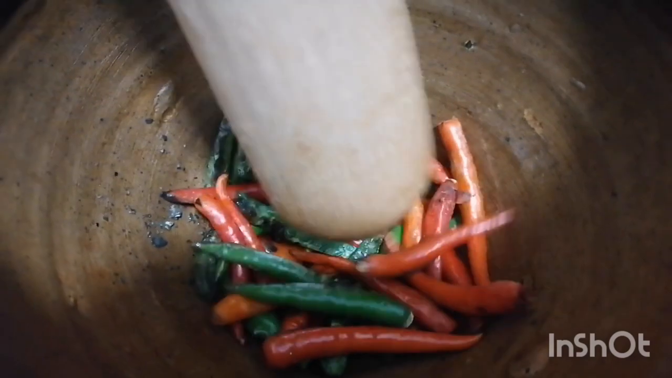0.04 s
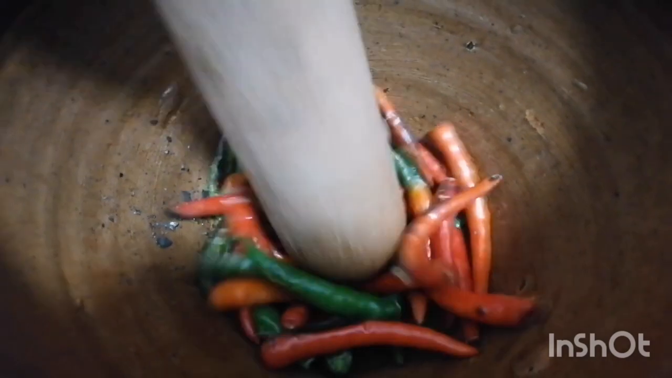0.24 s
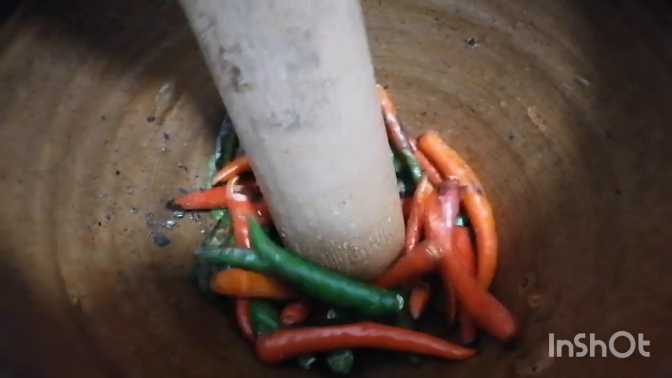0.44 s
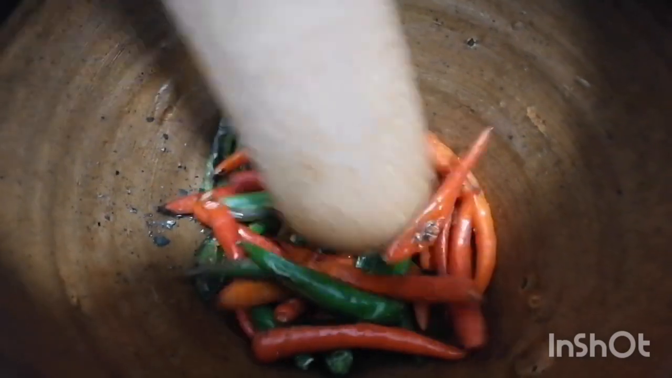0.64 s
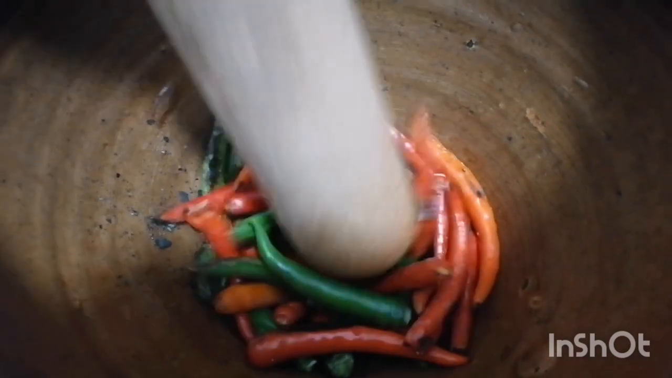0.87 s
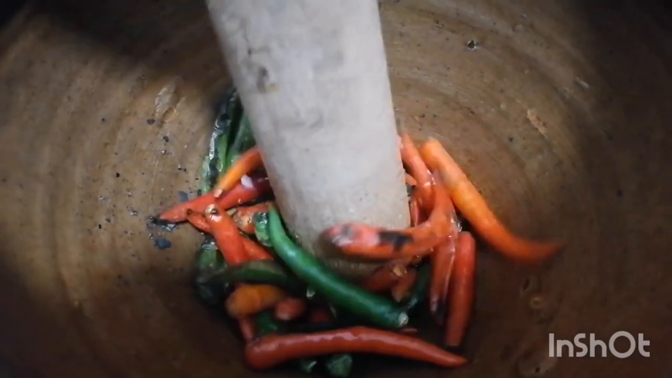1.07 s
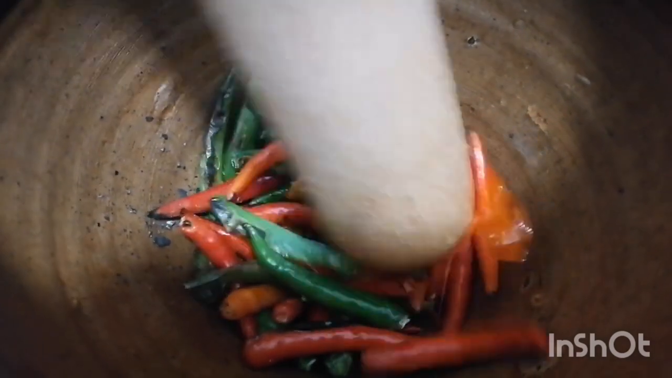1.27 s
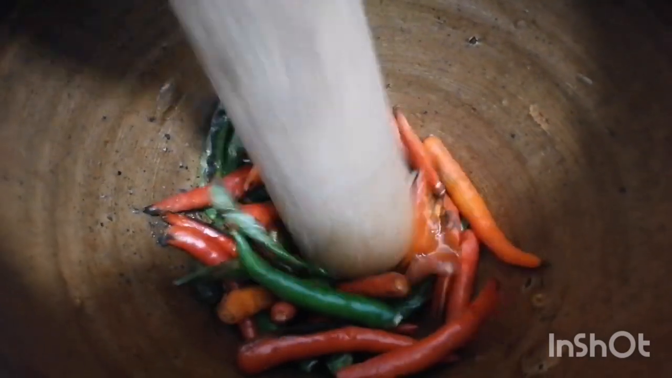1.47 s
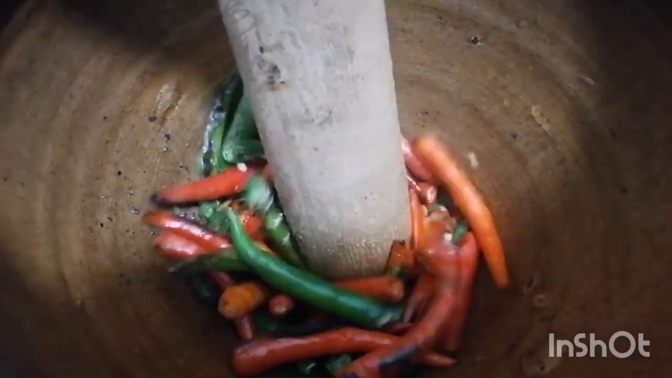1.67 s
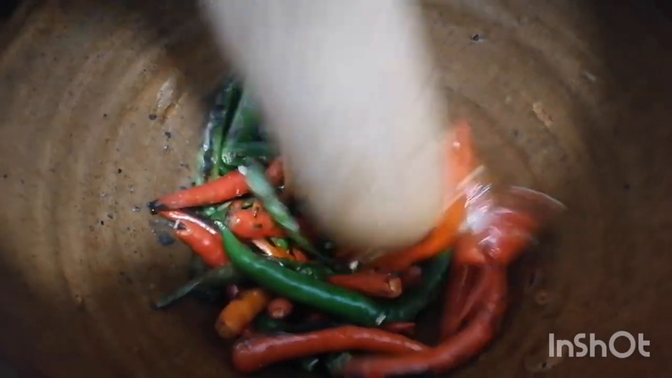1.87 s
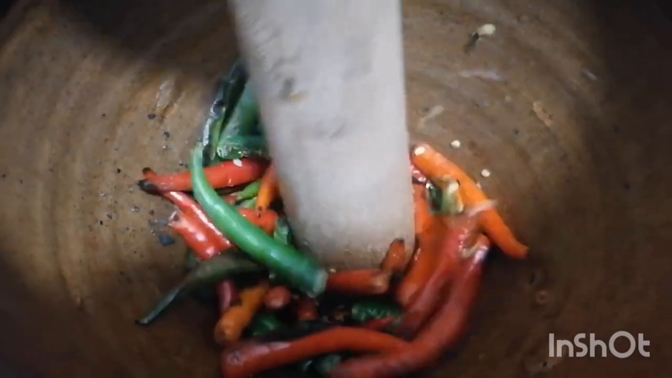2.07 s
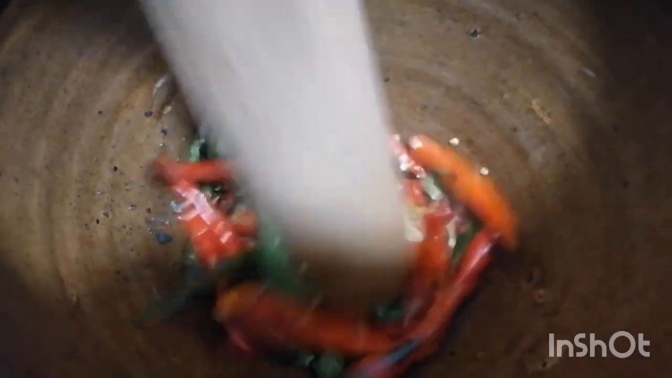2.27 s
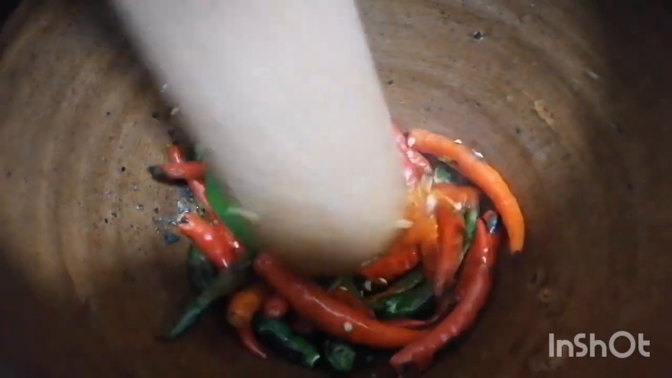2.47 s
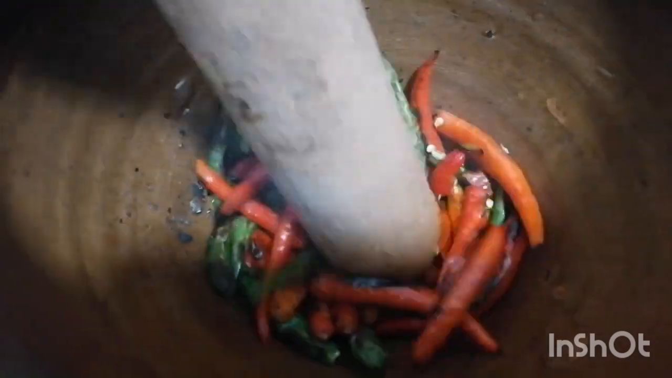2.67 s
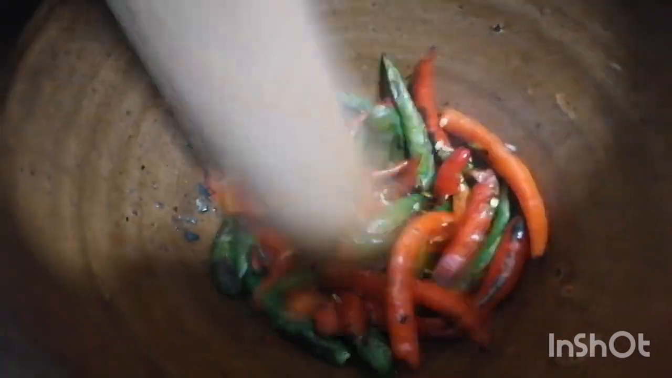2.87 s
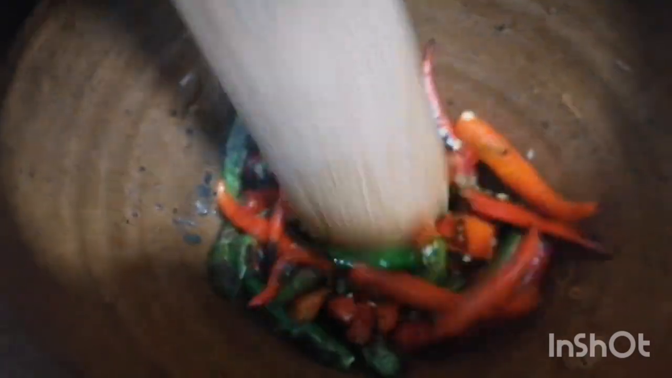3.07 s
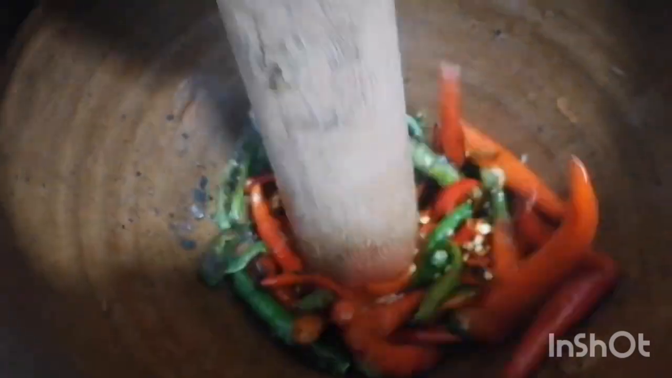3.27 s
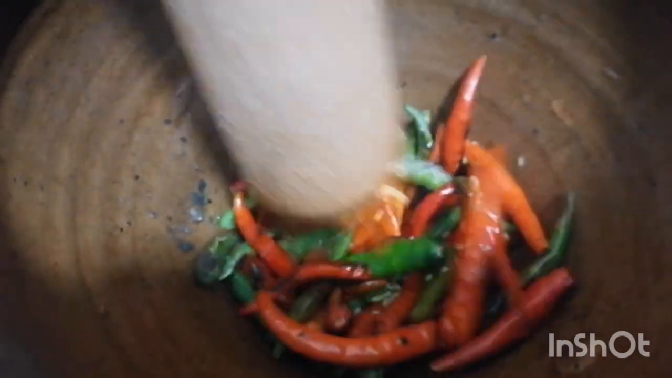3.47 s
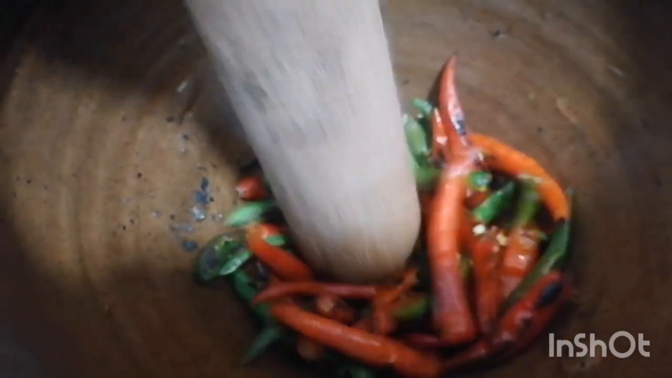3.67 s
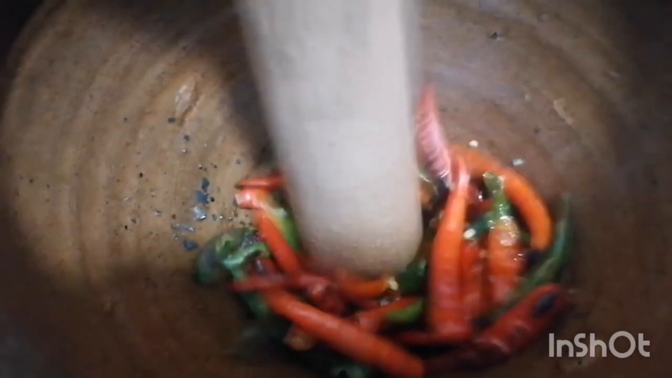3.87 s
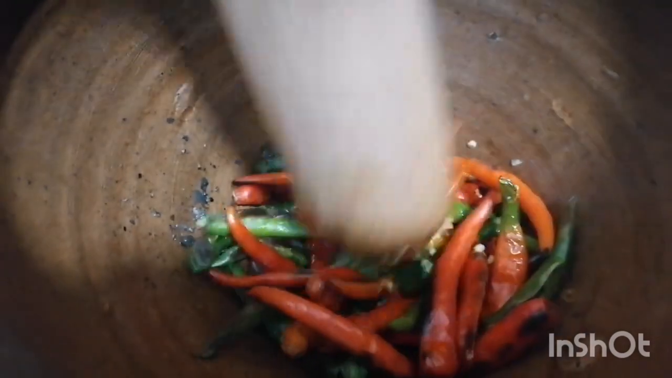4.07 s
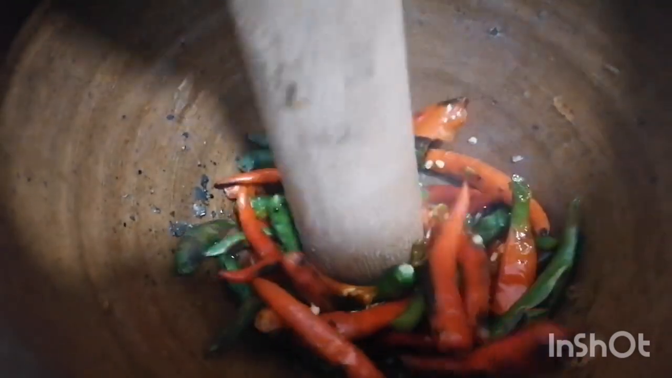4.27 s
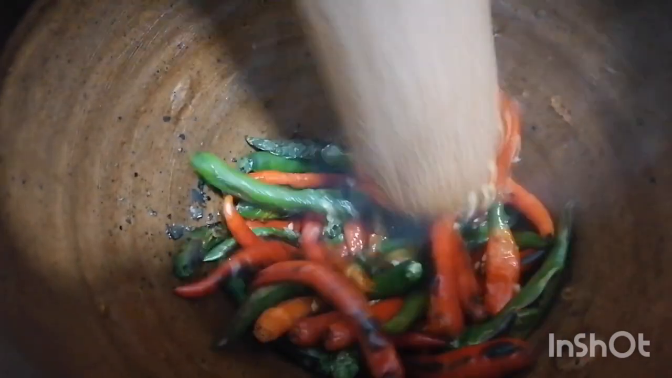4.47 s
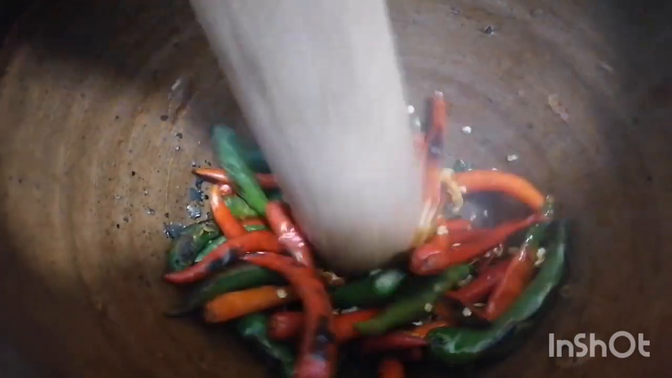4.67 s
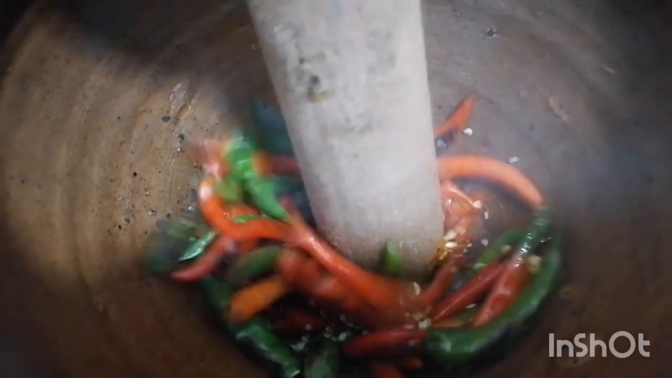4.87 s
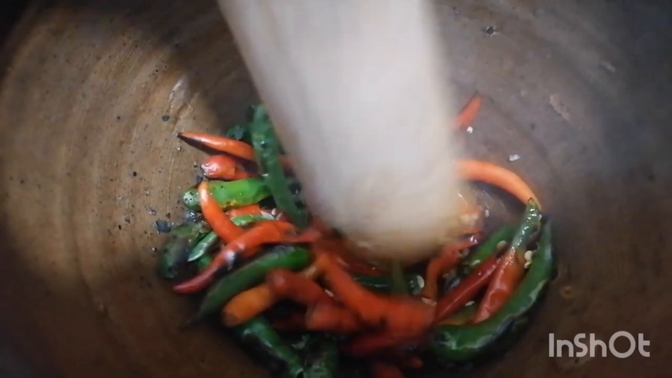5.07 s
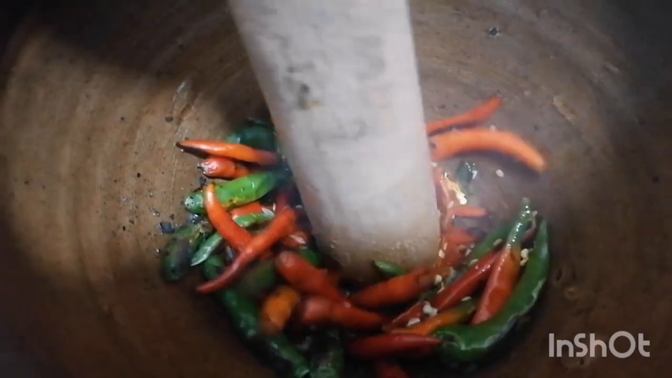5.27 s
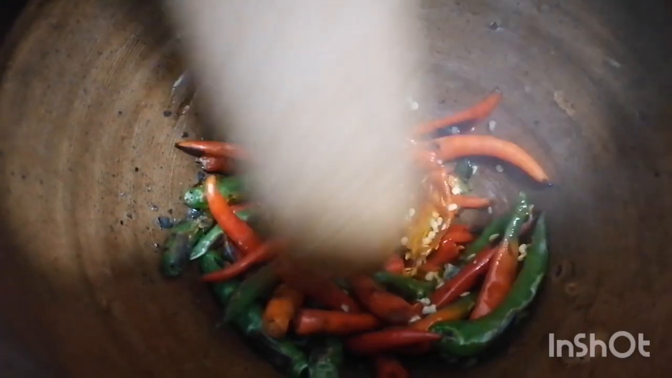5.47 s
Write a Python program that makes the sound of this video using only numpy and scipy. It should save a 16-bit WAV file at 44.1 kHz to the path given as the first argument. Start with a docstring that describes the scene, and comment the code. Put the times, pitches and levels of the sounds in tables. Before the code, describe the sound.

A wooden pestle pounds fresh chillies in a clay mortar about three times a second, each hollow knock wrapped in a wet, crackling crunch.

```python
"""Faint hiss and rumble come first, with the fading ring of an earlier stroke in a small kitchen.
Then a wooden pestle pounds fresh chillies in a clay mortar, about three blows a second.
Pods crackle and burst as swarms of random snaps over noise, echoed between the clay walls.
Each blow is a hollow double knock of decaying sine modes; the support under the mortar hums on.
Seeds tick as they fall back, low booms follow some blows, and filtered noise makes the room's answer."""
import sys
import numpy as np
from scipy import signal
from scipy.fft import rfft, irfft
from scipy.io import wavfile
from scipy.ndimage import uniform_filter1d

SR = 44100
rng = np.random.default_rng(int(sys.argv[2]) if len(sys.argv) > 2 else 0)


def inscribe(sig):
    """Save sig as 16-bit PCM at rate SR to the path in sys.argv[1].

    A 1-D sig is mono; a 2-D sig holds one channel per row.
    Samples are clipped to [-1, 1] before scaling.
    """
    pcm = np.round(np.clip(np.atleast_2d(sig).T, -1, 1) * 32767)
    wavfile.write(sys.argv[1], SR, pcm.astype(np.int16))


N = 243564
TIME = np.arange(N) / SR
GRID_HZ = np.linspace(0, SR / 2, 4097)


def from_db(db):
    """Level law: decibels become an amplitude ratio."""
    return 10 ** (np.asarray(db) / 20)


def rms_one(x):
    """Normalisation: scale to unit root-mean-square amplitude."""
    return x / np.sqrt(np.mean(x ** 2) + 1e-20)


def at_hz(points, hz, axis=1):
    """Interpolation on a logarithmic frequency axis: read one column of a spectrum."""
    points = np.array(points)
    return np.interp(np.log(np.maximum(hz, 1)), np.log(points[:, 0]), points[:, axis])


def dying(t, t60):
    """Exponential decay: the level falls by 60 dB in t60 seconds."""
    return np.exp(-np.log(1000) * t / t60)


def sine(hz, t, turns=0):
    """Simple harmonic motion, starting at a phase given in turns."""
    return np.sin(2 * np.pi * (hz * t + turns))


def filtered(x, order, hz, kind="low"):
    """Butterworth filtering: a passband without ripple."""
    return signal.sosfilt(signal.butter(order, hz, kind, fs=SR, output="sos"), x)


def add(track, s, sound):
    """Superposition: mix a sound into a track at time s."""
    start = max(round(s * SR), 0)
    track[..., start:start + sound.shape[-1]] += sound[..., :max(N - start, 0)]


def through(x, response):
    """Convolution: pass a sound through a left and a right impulse response."""
    return signal.fftconvolve(np.atleast_2d(x), response, axes=-1)[:, :N]


def colour(left_db, right_db):
    """Minimum phase: fold the cepstrum of each magnitude spectrum into a causal stereo filter."""
    cepstrum = irfft(np.log(from_db([left_db, right_db])))
    half = cepstrum.shape[1] // 2
    cepstrum[:, 1:half] *= 2
    cepstrum[:, half + 1:] = 0
    return irfft(np.exp(rfft(cepstrum)))


# Course of the deep rumble: (time [s], relative level [dB])
RUMBLE_COURSE = [(0, -71), (0.65, -59), (1.3, -77), (2.2, -72), (3.5, -79), (4.4, -75), (4.85, -63),
                 (5.52, -70)]


def rumble(level_db, top_hz, shared):
    """Partial coherence: low-band noise, of which a shared part is the same at both microphones."""
    white = rng.standard_normal((2, N)) + shared * rng.standard_normal(N)
    deep = filtered(white, 2, [25, top_hz], "band")
    times, levels_db = np.transpose(RUMBLE_COURSE)
    return from_db(np.interp(TIME, times, levels_db) + level_db) * rms_one(deep)


# Spectrum of room noise and hiss: (frequency [Hz], left relative level [dB], right relative level [dB])
HISS_SPECTRUM = [(25.2, -94, -96), (133, -85, -83), (330, -93, -90), (580, -94.5, -94), (1050, -92, -93),
                 (1390, -99, -99), (3450, -101, -94.5), (4820, -108, -102), (5170, -101, -94),
                 (7000, -94, -89.5), (8780, -109, -101), (10060, -109, -101), (12160, -113, -93),
                 (14100, -112, -103), (14000, -109, -99.5)]


def background(level_db):
    """Stationary noise: white noise takes a fixed spectrum at each microphone, over the rumble."""
    white = rng.standard_normal((2, N)) * np.sqrt(SR / 2)
    spectrum = colour(at_hz(HISS_SPECTRUM, GRID_HZ), at_hz(HISS_SPECTRUM, GRID_HZ, axis=2))
    hiss = from_db(level_db) * through(white, spectrum)
    return hiss + rumble(level_db=6.5, top_hz=96, shared=1.0) * from_db([[1.5], [-2.5]])


# Modes of the struck mortar: (ratio to the bowl pitch [1], relative amplitude [1], t60 [s])
MORTAR_MODES = [(1.0, 1.684, 0.032), (.43, -0.79, 0.0094), (.53, -0.078, 0.04), (.19, -0.067, 0.013)]


def landing(level_db, hz, cushion_hz=560, spread_db=2.0, lowest_hz=55):
    """Modal synthesis: a landing rings decaying modes, and the cushioning pulp low-passes them."""
    t = TIME[:SR // 5]
    ring = np.zeros(len(t))
    for ratio, amplitude, t60 in MORTAR_MODES:
        strength = from_db(level_db + spread_db * rng.standard_normal())
        ring += strength * amplitude * sine(ratio * hz, t) * dying(t, t60)
    ring = filtered(ring, 2, lowest_hz, "high")
    return filtered(ring + 1e-18, 4, cushion_hz)


# Diffuse answer of the kitchen: (frequency [Hz], relative level [dB], t60 [s])
KITCHEN_DECAY = [(70.6, 0, 0.19), (148, -1, 1), (288, -15.5, 0.48), (535, -18, 0.57), (1090, -23, 0.78),
                 (2670, -7, 0.38), (4000, -13.5, 0.46), (6500, -16.5, 0.55), (13800, -9, 0.088)]
# Standing waves of the kitchen: (frequency [Hz], level in the impulse response [dB], t60 [s])
STANDING_WAVES = [(220.5, -73, 1), (345.5, -71, 0.69), (389, -71, 0.53), (458, -66, 0.42),
                  (482, -74.5, 0.95), (517.5, -79.5, 0.76)]


def kitchen(build_s, count=16):
    """Reverberation: diffuse reflections die band by band, and a few standing waves ring on."""
    t = TIME[:SR * 4 // 5]
    response = np.zeros((2, len(t)))
    build_up = 1 - np.exp(-(t / build_s) ** 2)
    edges = np.geomspace(55, 16000, count + 1)
    for low, high in zip(edges, edges[1:]):
        hz = np.sqrt(low * high)
        band = filtered(rng.standard_normal((2, len(t))), 2, [low, high], "band")
        band = rms_one(band * dying(t, at_hz(KITCHEN_DECAY, hz, axis=2)) * build_up)
        # a wider band carries more energy
        width_gain = np.sqrt(2 * (high - low) / SR / len(t))
        response += from_db(at_hz(KITCHEN_DECAY, hz)) * band * width_gain
    for hz, level_db, t60 in STANDING_WAVES:
        response += from_db(level_db) * sine(hz, t, rng.random((2, 1))) * dying(t, t60)
    return response


def bowl_echoes(early_t60, late_t60, late_db, evenness, size=4096):
    """Multipath propagation: echoes between clay walls reach each microphone by paths of their own."""
    t = TIME[:size]
    spectrum = rfft(rng.standard_normal((2, size)) * dying(t, early_t60))
    # evenness 0 keeps the peaks and dips of the spectrum, 1 flattens them
    early = irfft(spectrum / np.abs(spectrum) ** evenness) * dying(t, late_t60)
    late = rng.standard_normal((2, size)) * dying(t, late_t60)
    paths = [rms_one(e) + from_db(late_db) * rms_one(l) for e, l in zip(early, late)]
    return np.array(paths) / np.sqrt(size)


# One pod crushed per stroke: (burst time [s], burst relative level [dB], burst swelling time [s],
# squeeze lead before the burst [s], squeeze relative level [dB],
# relative woody crunch [dB], relative wet sizzle [dB])
CRUSHED_PODS = [(0.1979, -18.5, 0.0028, 0.011, -32, -2.5, -4),
                (0.4989, -21.5, 0.0021, 0.011, -36.5, 8.5, 7), (0.8065, -22.5, 0.0025, 0.013, -37, 5, 9),
                (1.1243, -27.5, 0.0024, 0.014, -45, 8, 2), (1.4362, -24, 0.002, 0.012, -34.5, 1, -4),
                (1.7475, -27.5, 0.0053, 0.013, -39, 4, 0.5), (2.06, -27, 0.0051, 0.016, -37, 3.5, 2),
                (2.3801, -22, 0.0026, 0.014, -31, -3, 2), (2.701, -30, 0.0078, 0.032, -39.5, 0.5, -1),
                (3.0187, -24, 0.0044, 0.024, -35, -0.5, 1), (3.33, -32.5, 0.0057, 0.023, -35, 2, 1),
                (3.653, -33, 0.0059, 0.023, -39.5, 0.5, -7), (3.9729, -21.5, 0.0025, 0.014, -34.5, 2.5, 1),
                (4.2986, -25, 0.0044, 0.017, -35, -3, -9), (4.6301, -19, 0.0023, 0.021, -32.5, -3, -6.5),
                (4.961, -29, 0.01, 0.014, -30.5, -2, -18), (5.2838, -23.5, 0.006, 0.015, -33.5, 1, -4)]
# Sharp cracks of taut skins as the pestle comes down: (time [s], relative level [dB])
SKIN_SPLITS = [(2.6608, -39), (3.6324, -21.5), (4.2853, -25)]
# the longer a pod resists, the longer its squeeze swells and lingers (shares of the lead)
SQUEEZE_RISE_S, SQUEEZE_RISE_SHARE, SQUEEZE_FALL_SHARE = 0.0054, 0.18, 0.73
# the squeeze has more crunch than the burst, and still more sizzle
SQUEEZE_CRUNCH_DB, SQUEEZE_SIZZLE_DB = 1.5, 4
BURST_FALL_SHARE = 0.72  # of the burst's swelling time
SPLIT_S, SPLIT_CRUNCH_DB, SPLIT_SIZZLE_DB = 0.00033, -0.5, 2


def pod_stages():
    """Fracture in stages: a drawn-out squeeze, then a burst; a few skins also split sharply.

    Yields (peak time [s], level [dB], rise [s], fall [s], crunch [dB], sizzle [dB])."""
    for s, burst_db, swell, lead, squeeze_db, crunch_db, sizzle_db in CRUSHED_PODS:
        rise = SQUEEZE_RISE_S + SQUEEZE_RISE_SHARE * lead
        fall = SQUEEZE_FALL_SHARE * lead
        yield s - lead, squeeze_db, rise, fall, crunch_db + SQUEEZE_CRUNCH_DB, sizzle_db + SQUEEZE_SIZZLE_DB
        yield s, burst_db, swell, BURST_FALL_SHARE * swell, crunch_db, sizzle_db
    for s, level_db in SKIN_SPLITS:
        yield s, level_db, SPLIT_S, SPLIT_S, SPLIT_CRUNCH_DB, SPLIT_SIZZLE_DB


def crushing(snaps_per_s, size_spread_db, juice_share, crunch_hz, sizzle_hz):
    """Random impulse process: a swarm of cell snaps over a spray of juice, each with its own echoes."""
    t, out = TIME[:SR // 10], np.zeros((2, N))
    middle = t[-1] / 2
    below = signal.butter(2, crunch_hz, fs=SR)
    between = signal.butter(1, [crunch_hz, sizzle_hz], "band", fs=SR)
    above = signal.butter(2, sizzle_hz, "high", fs=SR)
    for s, level_db, rise, fall, crunch_db, sizzle_db in pod_stages():
        sizes = from_db(size_spread_db * np.minimum(rng.exponential(1, len(t)), 4))
        sizes = sizes * rng.choice([-1, 1], len(t))
        snaps = rms_one(sizes * (rng.random(len(t)) < snaps_per_s / SR))
        juice = juice_share * rng.standard_normal(len(t))
        swell = np.exp(-np.abs(t - middle) / np.where(t < middle, rise, fall))
        pod = rms_one((snaps + juice) * swell) * np.sqrt(np.mean(swell ** 2))
        # firm skin gives more low crunch, juicy flesh more sizzle
        crunch = from_db(crunch_db) * signal.lfilter(*below, pod)
        sizzle = from_db(sizzle_db) * signal.lfilter(*above, pod)
        pod = signal.lfilter(*between, pod) - crunch - sizzle
        echoes = bowl_echoes(early_t60=0.0049, late_t60=0.067, late_db=-1.5, evenness=0.48)
        add(out, s - middle, from_db(level_db) * through(pod, echoes))
    return out


# Crackle as it leaves the bowl: (frequency [Hz], relative level [dB])
CRACKLE_SPECTRUM = [(100, -10.5), (300, 1.5), (520, 3), (750, -6.5), (1000, -6), (1700, -2.5), (2400, -2.5),
                    (3100, 1), (4000, -4), (5500, -0.5), (7100, 3), (8000, -9.5), (11000, -11),
                    (15500, -16.5)]
# Stereo balance of the crackle: (frequency [Hz], left minus right [dB])
CRACKLE_LEAN = [(500, 14.5), (1000, 5), (1700, 7.5), (2400, -1.5), (3200, 1), (6000, -3.5), (7200, 2),
                (15000, -2)]


def out_of_bowl(pods, level_db):
    """Linear filtering: the crackle takes its spectrum and stereo balance on leaving the bowl."""
    shape_db = at_hz(CRACKLE_SPECTRUM, GRID_HZ)
    lean_db = at_hz(CRACKLE_LEAN, GRID_HZ) / 2
    return from_db(level_db) * through(pods, colour(shape_db + lean_db, shape_db - lean_db))


# Pestle landings: (time [s], relative knock level [dB], delay of second landing [s],
# relative level of second landing [dB], relative hum of the support [dB])
PESTLE_BLOWS = [(0.2045, -12, 0.0036, -22.5, -61), (0.5035, -6.5, 0.0074, -10.5, -64),
                (0.8065, -10.5, 0.0068, -11, -54), (1.1167, -17, 0.0074, -20.5, -60.5),
                (1.43, -16.5, 0.0051, -11, -52.5), (1.7382, -9.5, 0.0059, -14, -52),
                (2.0571, -11.5, 0.01, -33, -59), (2.3825, -13.5, 0.009, -19, -48),
                (2.7059, -11, 0.0099, -18.5, -62.5), (3.024, -4, 0.01, -12, -44),
                (3.3368, -16.5, 0.008, -37, -59), (3.6598, -10.5, 0.00667, -22, -53.5),
                (3.9629, -20.5, 0.0048, -32, -64.5), (4.2922, -15.5, 0.0074, -16.5, -60.5),
                (4.6111, -10.5, 0.0104, -25, -57), (4.9613, -19, 0.0114, -23.5, -48),
                (5.288, -11, 0.0086, -10.5, -54)]
# Light touches of the pestle on the wall, ahead of a stroke: (time [s], relative level [dB])
WALL_TOUCHES = [(2.047, -24.5), (3.631, -30), (4.2753, -30)]
# a harder landing squeezes the damping pulp aside, and the bowl rings higher
BOWL_HZ, BOWL_HZ_PER_DB, USUAL_KNOCK_DB = 531.6, 4, -10.5


def knocks():
    """Repeated impact: the pestle lands twice on every stroke, and at times brushes the wall first."""
    out = np.zeros(N)
    for s, first_db, delay, second_db, _ in PESTLE_BLOWS:
        hz = BOWL_HZ + BOWL_HZ_PER_DB * (first_db - USUAL_KNOCK_DB)
        add(out, s, landing(first_db, hz))
        add(out, s + delay, landing(second_db, hz))
    for s, level_db in WALL_TOUCHES:
        add(out, s, landing(level_db, BOWL_HZ))
    return out


# Modes of the support under the mortar: (frequency [Hz], relative level [dB], t60 [s])
SUPPORT_MODES = [(177.2, 1, 1.4), (216.8, 4, 0.5)]


def support(level_db, swell_s, damp_s):
    """Damped free vibration: the support hums after a blow until the pestle presses down again."""
    t, out = TIME[:SR // 2], np.zeros(N)
    starts = [blow[0] for blow in PESTLE_BLOWS]
    # the last hum is left to ring past the end
    free_times = np.diff(starts + [N / SR + 1])
    for (s, _, _, _, hum_db), free_s in zip(PESTLE_BLOWS, free_times):
        hum = np.zeros(len(t))
        for hz, mode_db, t60 in SUPPORT_MODES:
            hum += from_db(mode_db) * sine(hz, t, rng.random()) * dying(t, t60)
        held = (1 - np.exp(-t / swell_s)) * np.exp(-np.maximum(t - free_s, 0) / damp_s)
        add(out, s, from_db(hum_db + level_db) * hum * held)
    return out


def settling(level_db, ticks_per_s, settle_s):
    """Decaying event rate: seeds and wet skins fall back with ever rarer ticks after each blow."""
    stirred = np.zeros(N)
    for blow in PESTLE_BLOWS:
        stirred += np.exp(-np.abs(TIME - blow[0]) / settle_s) * (TIME > blow[0])
    ticks = rng.random(N) < ticks_per_s * stirred / SR
    return from_db(level_db) * rng.standard_normal(N) * ticks


# Short gliding tones after some blows, mostly the mortar rocking on its base; the last row is a higher tone
# near 215 Hz: (time [s], starting frequency [Hz], relative level [dB])
MORTAR_ROCKING = [(0.547, 137.6, -47), (0.851, 131, -46), (2.734, 152.2, -39.5), (3.38, 137.4, -47),
                  (5.331, 137, -42), (5.309, 214.5, -35)]


def rocking(swell_s, sag_per_s):
    """Frequency glide: a short low boom sags in pitch as the mortar settles."""
    t, out = TIME[:SR // 2], np.zeros(N)
    envelope = t / swell_s * np.exp(1 - t / swell_s)
    for s, hz, level_db in MORTAR_ROCKING:
        phase = 2 * np.pi * hz * np.cumsum(np.exp(-sag_per_s * t)) / SR
        add(out, s, from_db(level_db) * np.sin(phase) * envelope)
    return out


def scene():
    """Direct and reverberant field: the mortar's mouth faces the left microphone; the room reaches both."""
    response = kitchen(build_s=0.0064)
    pods = crushing(snaps_per_s=4500, size_spread_db=3.5, juice_share=0.56, crunch_hz=4450, sizzle_hz=8400)
    seeds = settling(level_db=-37.0, ticks_per_s=84, settle_s=0.06)
    seeds = through(seeds, bowl_echoes(early_t60=0.0024, late_t60=0.058, late_db=2, evenness=0.25))
    crackle = out_of_bowl(pods + seeds, level_db=5.5)
    knock = knocks()
    # the knock reaches the right microphone 0.3 ms later and weaker
    far_knock = from_db(-15.0) * np.interp(TIME - .0003, TIME, knock)
    direct = np.array([knock, far_knock]) + crackle
    hum = support(level_db=9, swell_s=0.013, damp_s=0.0084) + rocking(swell_s=0.03, sag_per_s=1.21)
    hum = hum * from_db([[0], [-5]])
    room = through(crackle + knock * from_db([[-1.5], [-5]]), response)
    # the room still rings from a stroke that fell 0.1 s before the scene opens
    earlier = through(landing(level_db=-13.5, hz=505), response)
    add(room, 0, earlier[:, SR // 10:])
    return direct + hum + room + background(level_db=1.5)


def gain_control(x, threshold_db, slope, release_db_per_s, attack_s):
    """Dynamic compression: level above a threshold turns the gain down, and it creeps back steadily."""
    power = uniform_filter1d(np.mean(x ** 2, axis=0), SR // 200)  # 5 ms average
    level_db = 10 * np.log10(np.maximum(power, 1e-12))
    cut_db = slope * np.maximum(level_db - threshold_db, 0)
    # a running maximum on a tilted axis lets the cut fall no faster than the release
    tilt_db = release_db_per_s * TIME
    cut_db = np.maximum.accumulate(cut_db + tilt_db) - tilt_db
    r = np.exp(-1 / (attack_s * SR))
    return x * from_db(-signal.lfilter([1 - r], [1, -r], cut_db))


def record(dry):
    """Compression and band limiting: gentle gain control, then a steep cut of the top."""
    held = gain_control(dry, threshold_db=-48.0, slope=0.16, release_db_per_s=13.5, attack_s=0.063)
    cutoff_hz = 15500
    return signal.sosfilt(signal.ellip(10, .2, 80, cutoff_hz, fs=SR, output="sos"), held)


dry = scene()
out = record(dry)
inscribe(out)
```